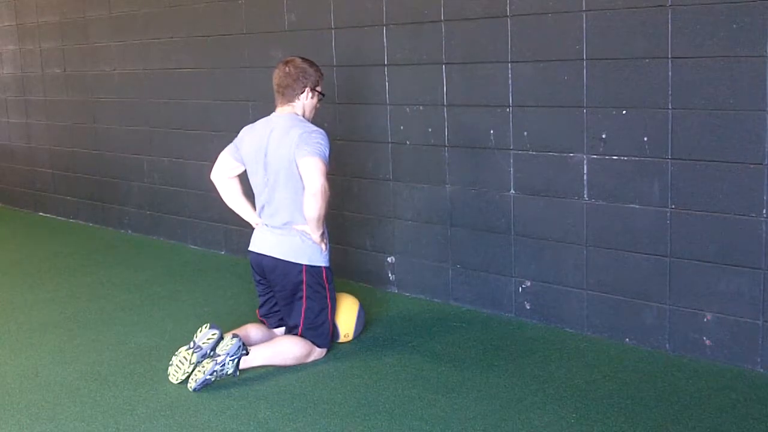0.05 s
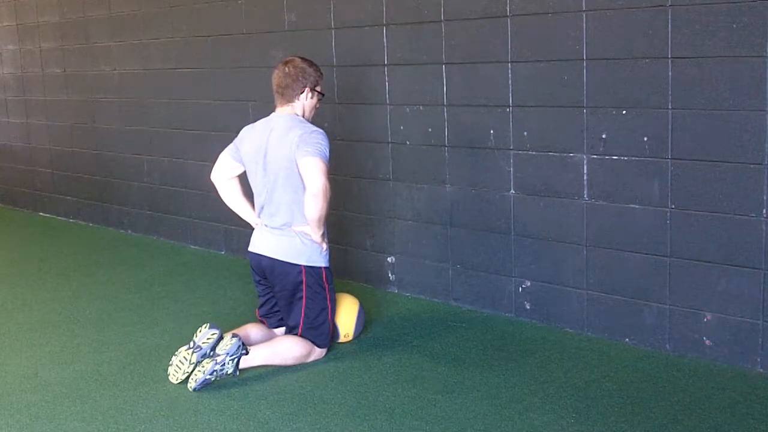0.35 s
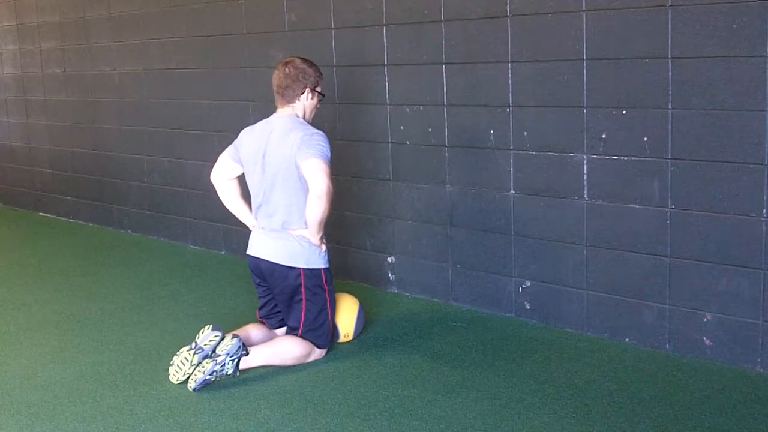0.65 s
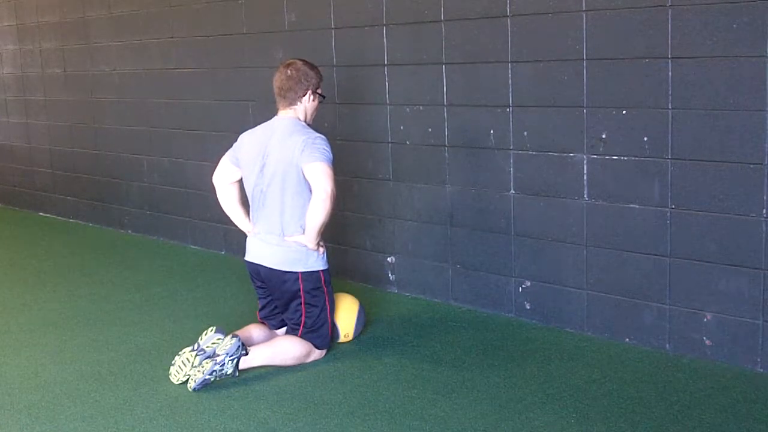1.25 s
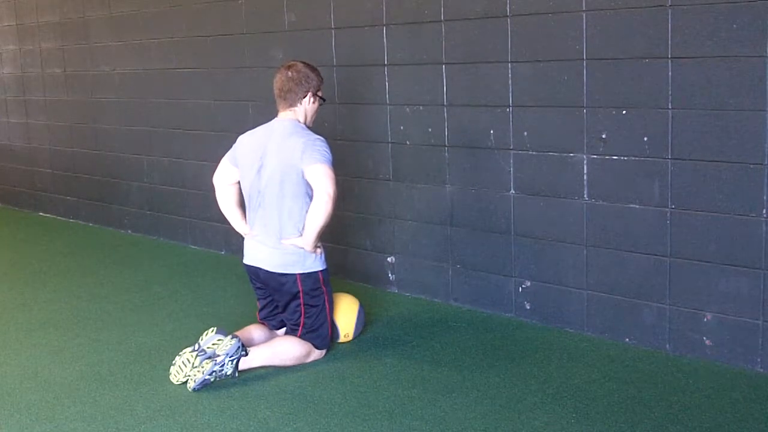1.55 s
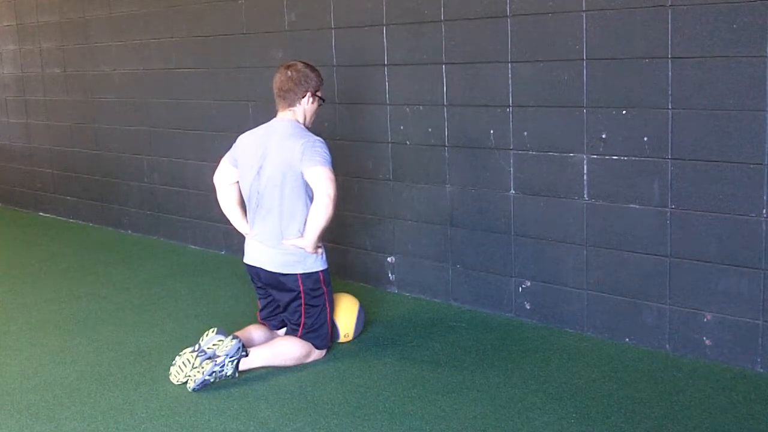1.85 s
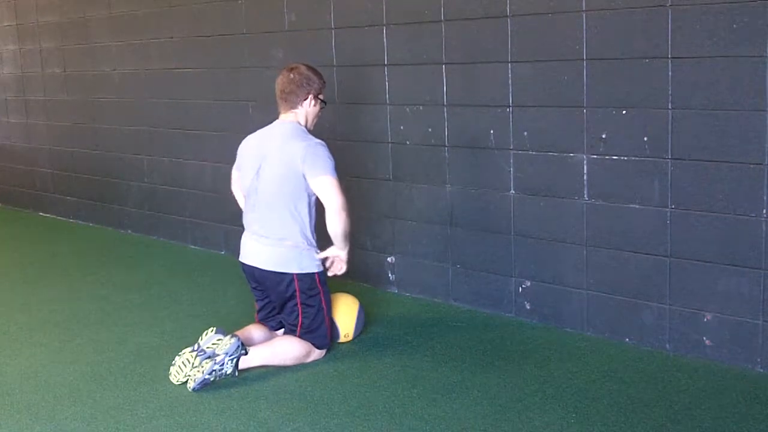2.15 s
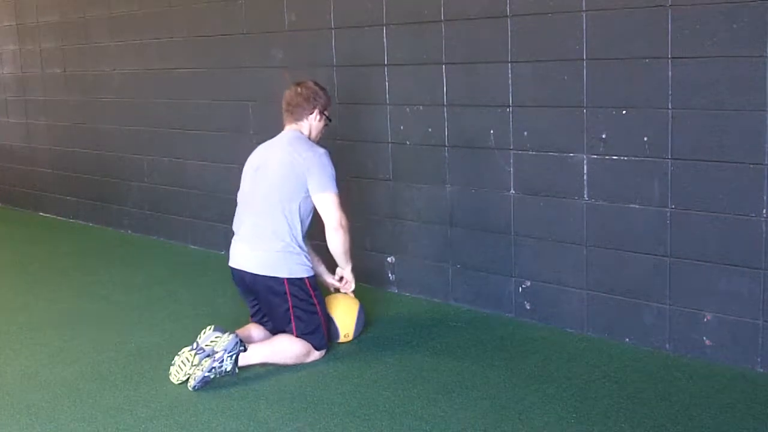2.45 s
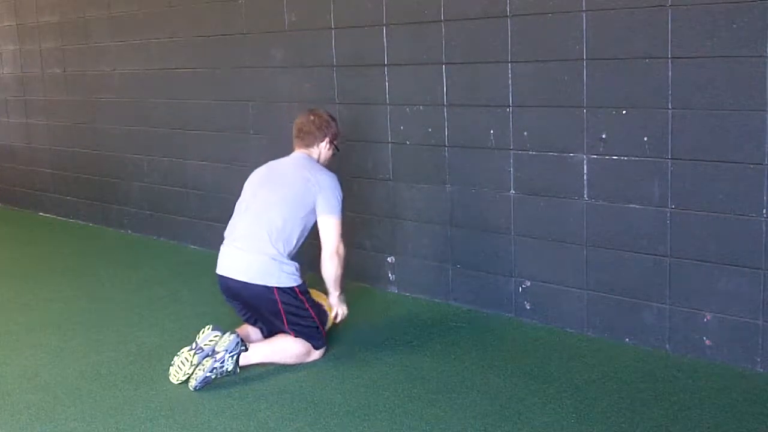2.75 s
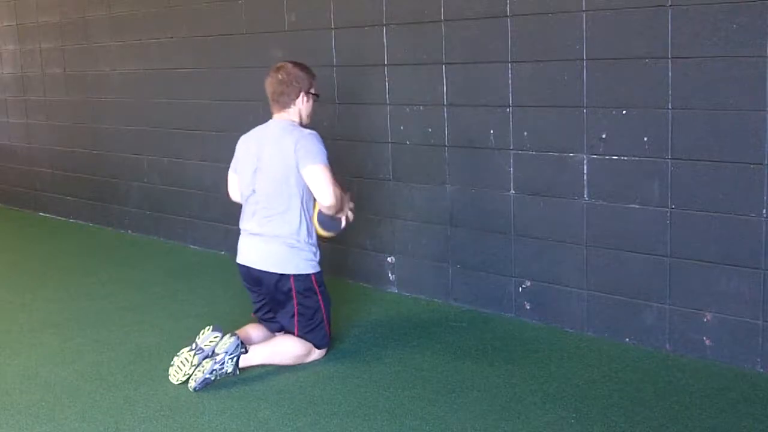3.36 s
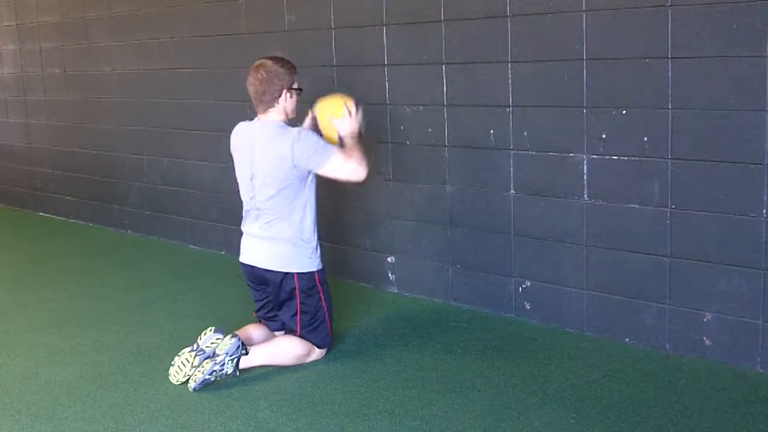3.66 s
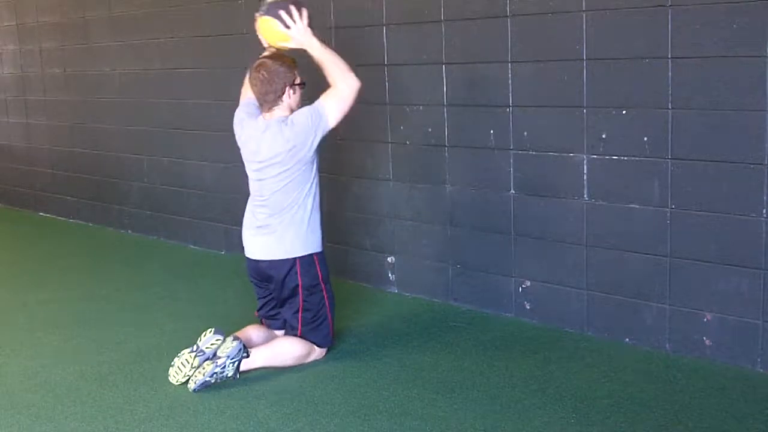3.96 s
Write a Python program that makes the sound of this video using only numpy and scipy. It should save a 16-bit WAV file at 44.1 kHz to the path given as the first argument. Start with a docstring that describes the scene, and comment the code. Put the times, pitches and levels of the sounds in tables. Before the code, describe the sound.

Traffic rumbles outside a quiet hall, then a big engine accelerates, booming through the walls.

```python
"""Traffic rumble and tyre wash from outside, heard in a quiet training hall under the thin whine of a fan.
Two cars pass a little nearer. Late on, a heavy eight-cylinder engine pulls away, its rising tones
booming through the walls as they cross the resonances of exhaust and hall. In the room, cloth slides
faintly on cloth as a kneeling man bends for a ball and lifts it.
The stereo image is narrow, the microphone hisses faintly, and the treble has a deep notch."""
import sys
import numpy as np
from scipy import signal
from scipy.fft import rfft, irfft
from scipy.io import wavfile

SR = 44100
rng = np.random.default_rng(int(sys.argv[2]) if len(sys.argv) > 2 else 0)


def dump_mix(stems):
    """Bounce the given channels to the path in sys.argv[1] as a 16-bit WAV at rate SR."""
    frames = np.atleast_2d(stems).T  # one column per channel
    limited = np.clip(frames, -1, 1)  # hard clip at full scale
    pcm = np.round(limited * 32767).astype(np.int16)
    wavfile.write(sys.argv[1], SR, pcm)


N = 176400

# engine speed in four-stroke cycles: time_s, cycle_rate_hz
ENGINE_SPEED = [(2.3, 7.3), (2.75, 7.48), (2.89, 7.8), (3.03, 8.25), (3.11, 8.76), (3.26, 9.72),
                (3.43, 10.4), (3.55, 11.0), (3.68, 11.5), (3.97, 11.8)]
# the engine as heard from inside the hall: time_s, gain_db
ENGINE_GAIN = [(2.0, -55.5), (2.6, -45), (2.8, -38.5), (3.05, -31.5), (3.3, -29), (3.55, -26.5),
               (3.7, -25.5), (3.88, -25.5), (4.0, -25.5)]
# strong multiples of the cycle rate, the eighth being the firing rate: multiple, gain_db
STRONG_ORDERS = [(5, -2), (8, -1), (16, 0.5), (24, -3.5)]
# exhaust and hall resonances: frequency_hz, gain_db
BOOM_RESONANCES = [(40, -16), (50, -12.5), (60, 0), (76, -10), (84, -6.5), (93, 3), (108, 4), (121, -2.5),
                   (136, 4), (156, -7), (171, -2.5), (192, -4), (215, -10), (250, -22.5), (285, -19)]
# weak multiples, from uneven cylinders: frequency_hz, gain_db
BURBLE_SPECTRUM = [(20, -40.5), (45, -36.5), (80, -22), (120, -16.5), (160, -18), (195, -9), (215, -20.5),
                   (250, -33), (315, -37.5), (375, -30.5), (440, -41), (500, -46)]
# roar of the engine under load: frequency_hz, relative_density_db
ROAR_SPECTRUM = [(400, -20), (580, -12.5), (700, 5), (860, -11.5), (1070, 4), (1330, -15.5), (1550, -7.5),
                 (2050, -26), (2470, -12.5), (3000, -31.5), (8000, -60)]
# traffic rumble from outside: frequency_hz, relative_density_db
RUMBLE_SPECTRUM = [(10, -24), (22, -4.5), (34, 0), (51, 1.5), (72, -3.5), (90, -6), (112, -2), (135, -4.5),
                   (165, -11), (205, -14), (245, -15), (305, -23.5), (500, -30), (1500, -73.5)]
# wash of distant tyres: frequency_hz, relative_density_db
WASH_SPECTRUM = [(100, 0), (300, -8.5), (400, 1), (570, -2.5), (700, 0.5), (900, -2), (1230, -4),
                 (1600, -10.5), (2100, -16), (3000, -25), (4000, -29), (5000, -32.5), (7000, -41),
                 (10000, -55.5), (15000, -64)]
# slow swell of that wash: time_s, level_db
WASH_LEVEL = [(0, -47), (.5, -48), (1.05, -47), (1.85, -46), (2.3, -47.5), (2.8, -48.5), (3.4, -47.5),
              (4.0, -46.5)]
# cars going by: nearest_s, half_length_s, tread_centre_hz, level_db
CAR_PASSES = [(0.989, 0.51, 1225, -50), (1.722, 0.33, 808, -53.5)]
# tread noise of one car: multiple_of_centre, relative_density_db
TREAD_SPECTRUM = [(.4, -26), (.8, -5.5), (1, 0), (1.22, -14.5), (1.8, -15.5), (3.3, -27.5), (8, -62)]
# swell and fade of the fan's lowest tone: time_s, level_db
HUM_LEVEL = [(0, -68.5), (.5, -65.5), (.66, -53.5), (0.901, -51), (1.2, -57.5), (1.8, -53.5), (2.598, -60),
             (2.9, -54.5), (3.2, -57), (4.0, -55)]
# higher fan tones: pitch_hz, level_db
WHINE_TONES = [(857, -60.5), (910, -67.5), (1716, -80.5), (2519, -84), (2687, -91), (3057, -80.5)]
# air from the fan: frequency_hz, relative_density_db
AIR_SPECTRUM = [(1500, -9.5), (3500, 2.5), (5000, 2.5), (6300, 4.5), (7500, -0.5), (8400, -7.5),
                (9500, -14), (10800, -12), (13000, -21.5)]
# cloth strokes: middle_s, half_length_s, level_db, sleeve_gain
CLOTH_STROKES = [(2.728, .1, -68, 0.5), (2.911, .13, -66.5, 0), (3.301, 0.28, -70, .2),
                 (3.929, 0.32, -65.5, 0.9)]
# cloth rubbing on cloth: frequency_hz, relative_density_db
CLOTH_SPECTRUM = [(500, -15.5), (1500, -7.5), (2800, 10), (4200, 2), (6500, -3.5), (9000, -17.5),
                  (14000, -28)]
# swish of the sleeve: frequency_hz, relative_density_db
SLEEVE_SPECTRUM = [(2000, -24.5), (3600, -6.5), (3950, 7.5), (4300, 0.5), (4800, -11), (5800, -0.5),
                   (6500, -13), (10000, -24), (13000, -26)]
# microphone hiss: frequency_hz, relative_density_db
HISS_SPECTRUM = [(100, 6), (6000, 1), (12500, 10.5), (13300, -15), (15000, -12)]
# stereo width, side against mid: frequency_hz, side_gain_db
STEREO_WIDTH = [(20, -8.5), (100, -44), (250, -59), (1000, -53.5), (2000, -38), (4000, -27.5),
                (8000, -21.5), (15000, -17)]


def engine(waver_hz=3.44, speed_jitter=0.0013, surge_turns=0.004, gear_order=94.5):
    """Beyond the walls, multiples of the cycle rate climb through fixed resonances and a gear whines."""
    cycle_hz = over_time(ENGINE_SPEED) * (1 + speed_jitter * drift(waver_hz))
    turns = np.cumsum(cycle_hz) / SR
    crank = turns + surge_turns * np.sin(2 * np.pi * turns)  # surges slightly once a cycle
    strong_db = {round(order): db for order, db in STRONG_ORDERS}
    tones = amp(-35) * tone(gear_order * turns, waver=0.51, rate_hz=4.5)
    for order in range(2, 42):
        pitch_hz = order * cycle_hz
        if order in strong_db:
            boom = amp(strong_db[order] + over_pitch(BOOM_RESONANCES, pitch_hz))
            tones += boom * tone(order * crank, waver=0.075, rate_hz=waver_hz)
        # the surging crank already supplies the neighbours of each strong order
        elif order - 1 not in strong_db and order + 1 not in strong_db:
            burble = amp(over_pitch(BURBLE_SPECTRUM, pitch_hz))
            tones += burble * tone(order * crank, waver=0.3, rate_hz=waver_hz)
    return tones * amp(over_time(ENGINE_GAIN))


def engine_roar(start_s=3.5, rise_s=0.13, level_db=-50.5):
    """Midrange noise comes up as the engine takes the load."""
    load = np.clip((np.arange(N) / SR - start_s) / rise_s, 0, 1)
    return amp(level_db) * load * noise(ROAR_SPECTRUM)


def traffic(rumble_db=-35):
    """The road outside: low rumble, the wash of distant tyres, and the treads of two nearer cars."""
    rumble = amp(rumble_db) * patchy(noise(RUMBLE_SPECTRUM), depth_db=0.32)
    cars = np.zeros(N)
    for nearest_s, half_length_s, centre_hz, level_db in CAR_PASSES:
        tread = noise([(multiple * centre_hz, db) for multiple, db in TREAD_SPECTRUM])
        cars += amp(level_db) * swell(nearest_s, half_length_s) * tread
    wash = amp(over_time(WASH_LEVEL)) * patchy(noise(WASH_SPECTRUM), depth_db=1.28)
    return rumble + cars + wash


def fan(hum_hz=430.6):
    """A rough hum swells and fades under a few thin, wavering tones."""
    t = np.arange(N) / SR
    hum = amp(over_time(HUM_LEVEL)) * tone(hum_hz * t, waver=0.39, rate_hz=24)
    whine = sum(amp(db) * tone(hz * t, waver=0.15, rate_hz=7.1) for hz, db in WHINE_TONES)
    return hum + whine


def fan_air(start_s=0.47, rise_s=0.24, level_db=-68, fade_db_per_s=13):
    """A thin hiss of air rises with the first swell of the hum and dies away slowly."""
    age_s = np.arange(N) / SR - start_s
    rise = np.clip(age_s / rise_s, 0, 1)
    fade_db = fade_db_per_s * np.maximum(age_s - rise_s, 0)
    return rise * amp(level_db - fade_db) * patchy(noise(AIR_SPECTRUM), depth_db=2.5)


def clothes(grain_depth=0.079, grain_hz=50):
    """Soft, grainy strokes of cloth sliding on cloth; the sleeve swishes as the arm goes up."""
    rub, sleeve = noise(CLOTH_SPECTRUM), noise(SLEEVE_SPECTRUM)
    strokes = np.zeros(N)
    for middle_s, half_length_s, level_db, sleeve_gain in CLOTH_STROKES:
        strokes += amp(level_db) * swell(middle_s, half_length_s) * (rub + sleeve_gain * sleeve)
    grain = unit(np.exp(grain_depth * drift(grain_hz)))
    return strokes * grain


def microphone_hiss(level_db=-96.5):
    """The microphone's own steady noise, far below the room."""
    return amp(level_db) * noise(HISS_SPECTRUM)


def amp(db):
    """Decibels to gain."""
    return 10 ** (np.asarray(db) / 20)


def unit(x):
    """Scales to rms 1."""
    return x / np.sqrt(np.mean(abs(x) ** 2) + 1e-20)


def over_time(points):
    """Joins (time_s, value) rows with straight lines."""
    return np.interp(np.arange(N) / SR, *np.transpose(points))


def over_pitch(points, hz):
    """Reads (frequency_hz, value) rows on a log-frequency axis."""
    row_hz, value = np.transpose(points)
    return np.interp(np.log(hz + 1), np.log(row_hz + 1), value)


def swell(middle_s, half_length_s):
    """A bell-shaped rise and fall, down to 1/e at half_length_s either side."""
    return np.exp(-((np.arange(N) / SR - middle_s) / half_length_s) ** 2)


def drift(rate_hz):
    """Slow random motion of rms 1."""
    hz = np.fft.rfftfreq(N, 1 / SR)
    return unit(irfft(rfft(rng.standard_normal(N)) * np.exp(-(hz / rate_hz) ** 2), N))


def tone(turns, waver, rate_hz):
    """A sine of rms near 1 whose strength and phase wander."""
    angle = 2 * np.pi * (turns + rng.random())
    in_phase = (1 + waver * drift(rate_hz)) * np.cos(angle)
    quadrature = waver * drift(rate_hz) * np.sin(angle)
    return np.sqrt(2) * (in_phase + quadrature)


def noise(spectrum):
    """Steady noise with the given spectrum, rms 1."""
    gain = amp(over_pitch(spectrum, np.fft.rfftfreq(N, 1 / SR)))
    return unit(irfft(rfft(rng.standard_normal(N)) * gain, N))


def patchy(x, depth_db, patch_hz=215, patch_s=0.14):
    """Lets patches of the spectrum swell and sink at random; rms 1."""
    frames = signal.stft(x, nperseg=2048, noverlap=1536)[2]
    across = np.fft.fftfreq(frames.shape[0], SR / 2048)[:, None] * patch_hz
    along = np.fft.fftfreq(frames.shape[1], 512 / SR) * patch_s
    blur = np.exp(-2 * (across ** 2 + along ** 2))
    patches = np.fft.ifft2(np.fft.fft2(rng.standard_normal(frames.shape)) * blur).real
    frames *= amp(depth_db * unit(patches))
    return unit(signal.istft(frames, nperseg=2048, noverlap=1536)[1][:N])


def scene():
    """The hall from the microphone: nearly mono, a little wider in the deepest bass and the treble."""
    mid = engine() + engine_roar() + traffic() + fan() + fan_air() + clothes() + microphone_hiss()
    hz = np.fft.rfftfreq(N, 1 / SR)
    random_phase = np.exp(2j * np.pi * rng.random(len(hz)))
    side = irfft(rfft(mid) * amp(over_pitch(STEREO_WIDTH, hz)) * random_phase, N)
    return np.array([mid + side, mid - side])


def record(dry):
    """The sound has a deep notch in the treble, and the highest treble is cut off steeply."""
    notch_hz, width_hz, depth, cutoff_hz = 5440, 2220, 0.94, 13200
    b, a = signal.iirnotch(notch_hz, notch_hz / width_hz, SR)
    coloured = depth * signal.lfilter(b, a, dry) + (1 - depth) * dry
    lowpass = signal.firwin(511, cutoff_hz, window=("kaiser", 9), fs=SR)
    return signal.oaconvolve(coloured, lowpass[None], "same")


dry = scene()
out = record(dry)
dump_mix(out)
```